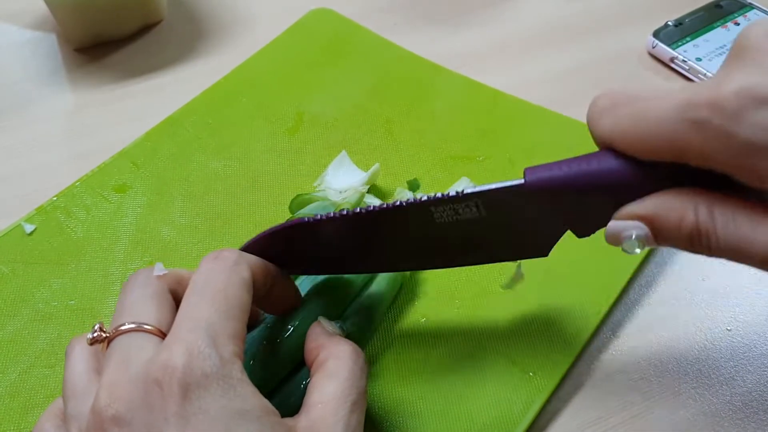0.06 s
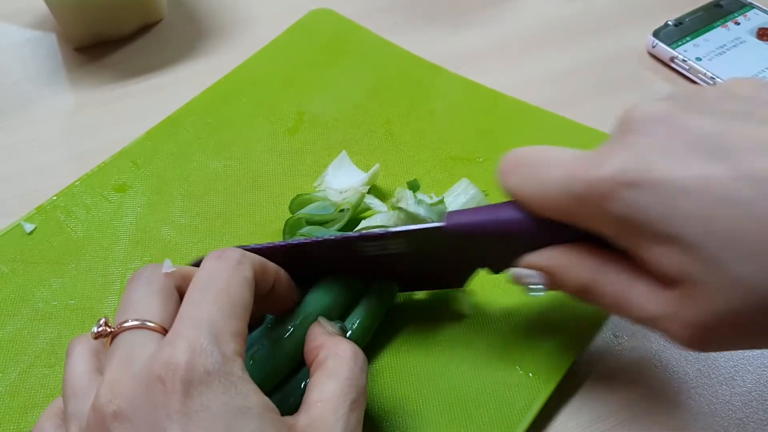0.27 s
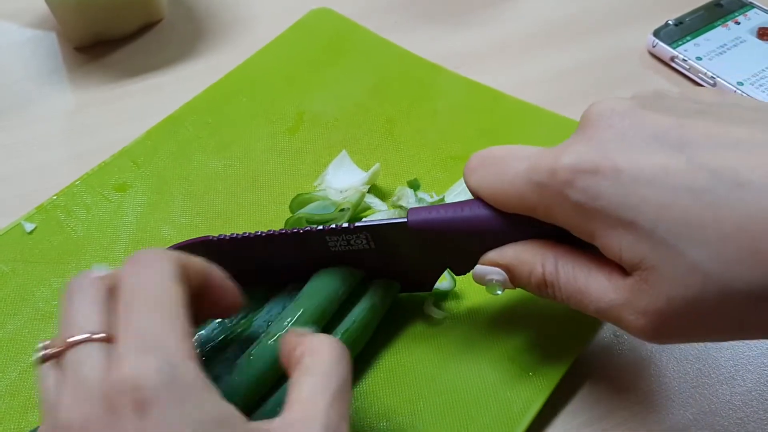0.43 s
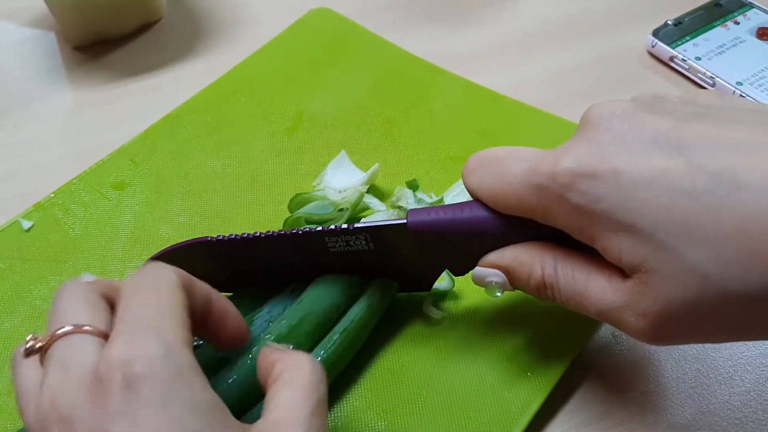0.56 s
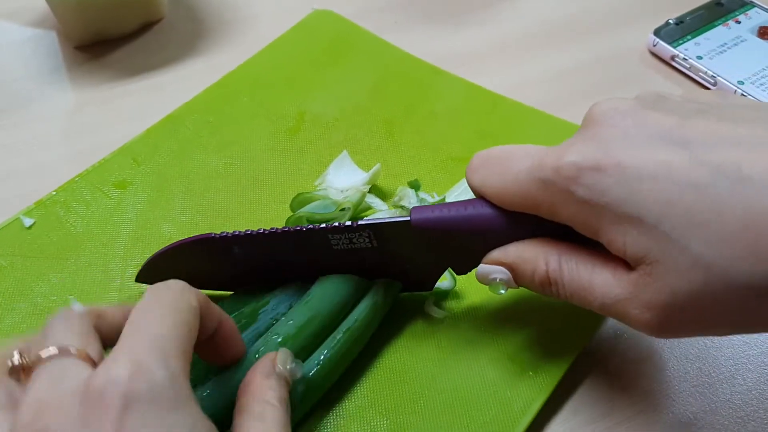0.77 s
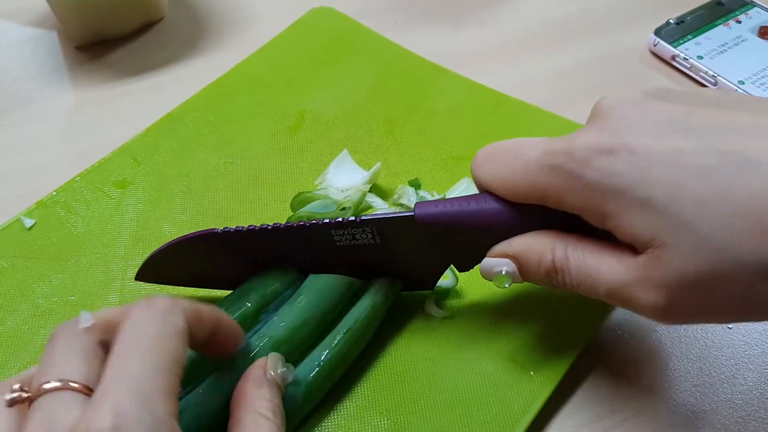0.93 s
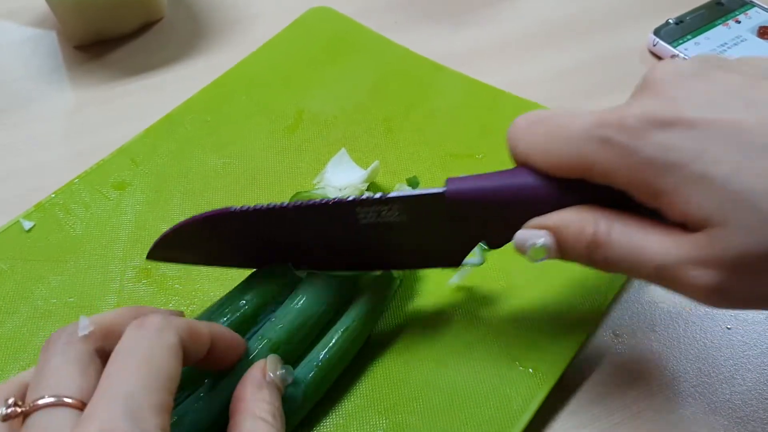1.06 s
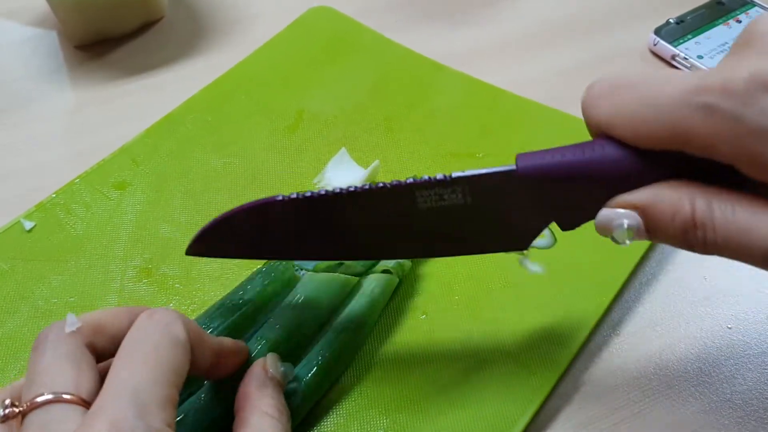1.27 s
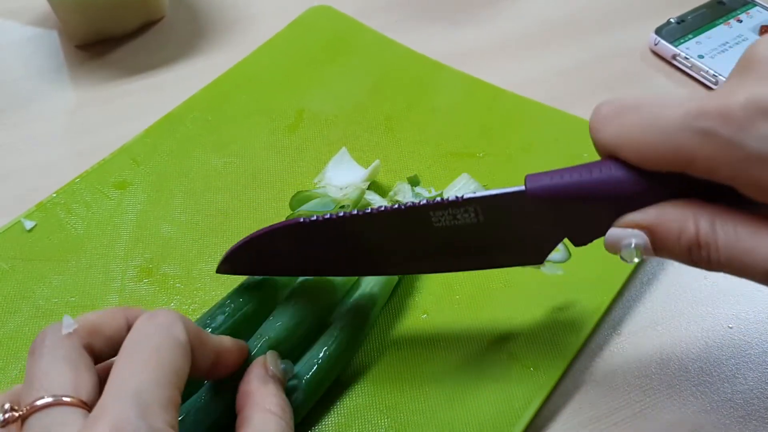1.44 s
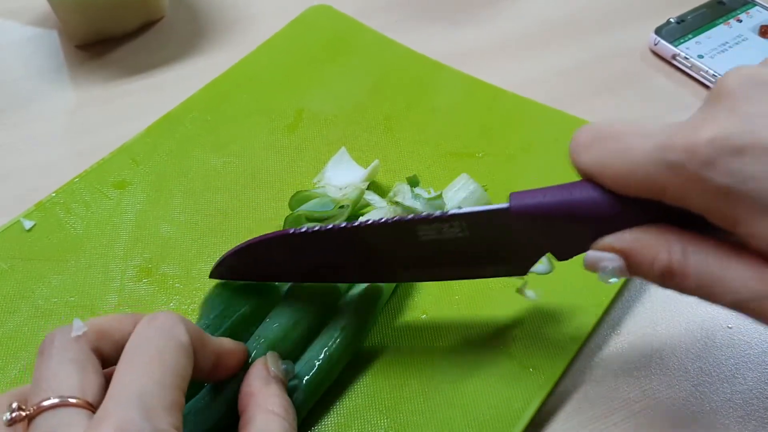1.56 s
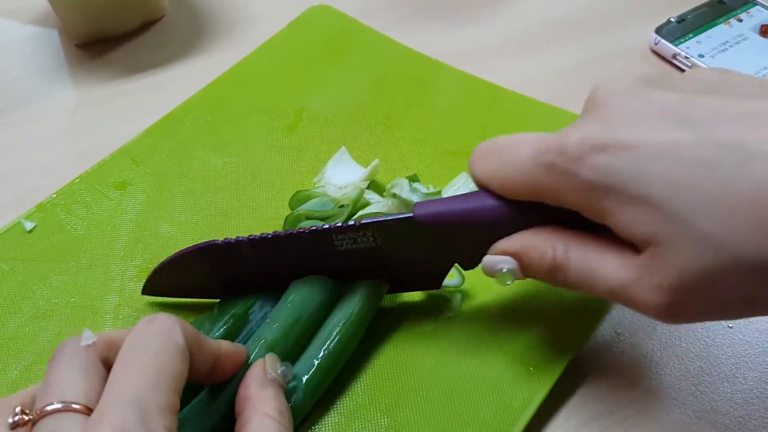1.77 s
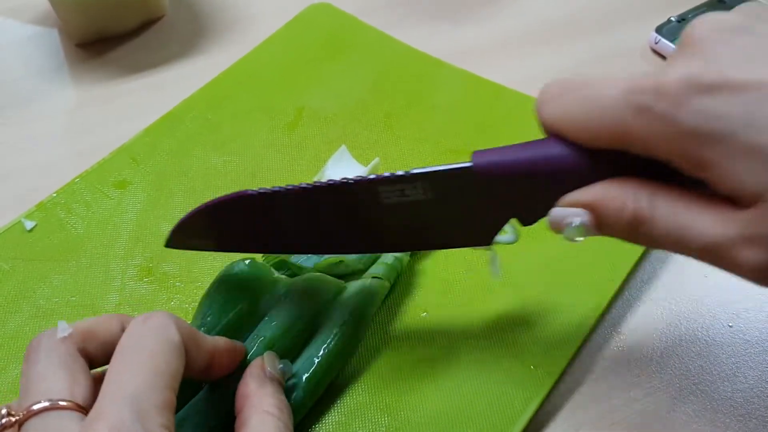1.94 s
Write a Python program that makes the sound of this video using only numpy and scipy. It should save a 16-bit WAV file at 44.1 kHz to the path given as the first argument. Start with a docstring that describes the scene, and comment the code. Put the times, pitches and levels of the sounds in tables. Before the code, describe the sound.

Two crisp, wet knife cuts through fibrous onion stalks, each ending in a knock on the board

```python
"""In a quiet kitchen, a knife cuts twice through a bunch of green onion stalks on a plastic board.
Crunch and rustle are dense random clicks, filtered into bands that follow level curves; single fibres
snap as a sharp tick and a resonant pop; the blade's blows are smooth pushes that ring the board's modes.
A close pair of microphone ports hears this, with a short reverberant tail and steady room tone behind."""
import sys
import numpy as np
from scipy import signal
from scipy.fft import rfft, irfft
from scipy.io import wavfile
from scipy.ndimage import uniform_filter1d

SR = 44100
rng = np.random.default_rng(int(sys.argv[2]) if len(sys.argv) > 2 else 0)


def master_out(mix):
    """Clip the mix to full scale and print it as 16-bit PCM to the path in sys.argv[1]."""
    frames = np.transpose(np.atleast_2d(mix))
    ceiling = np.clip(frames, -1, 1)
    pcm = np.round(ceiling * 32767).astype(np.int16)
    wavfile.write(sys.argv[1], SR, pcm)


N = 88200  # samples: two seconds


def amp(db):
    """Decibel definition: 20 dB is a tenfold amplitude ratio."""
    return 10 ** (np.asarray(db) / 20)


def evened(x):
    """Normalisation to unit root-mean-square amplitude."""
    return x / np.sqrt(np.mean(x ** 2) + 1e-20)


def read(points, hz):
    """Interpolation of a curve along a logarithmic frequency axis."""
    f, value = np.transpose(points)
    return np.interp(np.log(hz + 1), np.log(f + 1), value)


def add(mix, s, sound):
    """Superposition: a sound starting at s seconds sums into the mix, cut off at its end."""
    part = mix[round(s * SR):][:len(sound)]
    part += sound[:len(part)]


def colour(x, points):
    """Linear filtering: the spectrum is weighted by a curve that falls away outside its ends."""
    (low_hz, low_db), (high_hz, high_db) = points[0], points[-1]
    curve = [(low_hz / 1.5, low_db - 25)] + list(points) + [(high_hz * 1.5, high_db - 25)]
    gain = amp(read(curve, np.fft.rfftfreq(x.shape[-1], 1 / SR)))
    return irfft(rfft(x) * gain, x.shape[-1])


def ring(x, hz, t60):
    """Damped resonance: a unit click excites a decaying sine whose envelope starts near 1."""
    radius = 10 ** (-3 / (t60 * SR))
    w = 2 * np.pi * hz / SR
    return signal.lfilter([0, np.sin(w)], [1, -2 * radius * np.cos(w), radius * radius], x)


# Spectra of the three upper crackle layers. Each row: frequency in Hz, relative level in dB.
SIZZLE_SPECTRUM = [(4710, -24.5), (8000, -7.5), (12300, -3), (15300, -8), (16300, -18.5), (16500, -56.5)]
FIZZ_SPECTRUM = [(1760, 2), (3000, -0.5), (3920, 4), (6080, -3), (8000, -35.5), (10400, -40.5),
                 (17600, -120)]
BODY_SPECTRUM = [(380, -13.5), (650, 2), (720, -3.5), (1110, -6), (1190, -8), (3000, -12), (3900, -38),
                 (6600, -120)]
SHARED = 0.53  # amplitude share of the crackle that both ports hear alike; the fibres lie spread out


def crackle(passages, clicks_per_s, spread_db, low):
    """Shot noise: dense clicks of uneven size, heard as sizzle, fizz and body over a low part."""
    t = np.arange(N) / SR
    clicks = rng.standard_normal((4, N)) * (rng.random((4, N)) < clicks_per_s / SR)
    clicks = clicks * amp(spread_db * np.minimum(rng.exponential(1, (4, N)), 4))
    pair = SHARED * clicks[0] + np.sqrt(1 - SHARED ** 2) * clicks[1:3]
    upper = [colour(pair, curve) for curve in (SIZZLE_SPECTRUM, FIZZ_SPECTRUM, BODY_SPECTRUM)]
    layers = [evened(layer) for layer in upper + [low(clicks[3])]]
    out = np.zeros((2, N))
    for passage in passages:
        s, *levels = np.transpose(passage)
        for layer, db in zip(layers, levels):
            out += layer * amp(np.interp(t, s, db, -140, -140))  # silent outside the passage
    return out


# Crunch of tearing fibres, in passages of level curves.
# Each row: time in seconds, then sizzle, fizz, body and low levels in dB before the crackle trim.
CRUNCH_PASSAGES = [
    [(0.1, -87.5, -86, -77.5, -61), (0.148, -56, -57.5, -53, -67.5), (0.164, -50.5, -49.5, -48, -44),
     (0.176, -35, -40.5, -34.5, -35), (0.194, -31, -35.5, -40.5, -54), (0.214, -26, -30, -24.5, -23.5),
     (0.234, -33.5, -32, -36.5, -24.5), (0.35, -60, -60, -50, -47.5), (0.382, -46, -47.5, -55.5, -50.5),
     (0.39, -56, -53.5, -54.5, -50), (0.48, -78, -78.5, -65, -62)],
    [(1.49, -83, -79, -61, -76), (1.522, -58.5, -56, -49.5, -49), (1.53, -56, -44.5, -36.5, -59),
     (1.542, -49.5, -53, -41.5, -52), (1.586, -43.5, -47, -44, -50), (1.594, -48, -49, -53.5, -51),
     (1.606, -37, -33, -28, -29), (1.614, -34.5, -43, -38.5, -30.5), (1.628, -30.5, -29.5, -33, -41),
     (1.638, -37, -36, -38.5, -34.5)],
    [(1.65, -31, -27, -36.5, -27), (1.67, -31, -31.5, -35, -33.5), (1.698, -35, -34, -38, -34),
     (1.804, -60, -54.5, -56, -54.5), (1.824, -58.5, -54.5, -45.5, -54), (1.904, -75.5, -70.5, -63.5, -80),
     (1.98, -84, -73, -79, -59.5)],
]
PRESSED = 0.6  # factor on the board's ring times during the crunch


def crunch():
    """Forced vibration: tearing fibres crackle, and their clicks drive the damped board."""
    passages = [CRUNCH_PASSAGES[0], CRUNCH_PASSAGES[1] + CRUNCH_PASSAGES[2]]
    return crackle(passages, 14000, 2.7, low=lambda force: board(force, PRESSED))


# Single fibres snapping. Each row: tick start in seconds, tick peak in dB, tick centre in Hz,
# pop peak in dB, pop pitch in Hz.
FIBRE_SNAPS = [(0.127, -43, 7950, -57, 1310), (0.142, -41, 9700, -43, 1210), (0.169, -34, 11900, -40, 885),
               (.178, -26.5, 11900, -26, 1470), (0.205, -20, 9000, -24, 1400),
               (0.214, -21.5, 11100, -27.5, 1510), (0.22, -20, 14000, -21, 1830),
               (0.251, -17, 12100, -26.5, 1680), (0.363, -33, 9100, -44, 2040),
               (.378, -38, 8500, -37, 2160), (.55, -50, 5000, -43, 2040), (.555, -35, 9900, -64, 1410),
               (0.561, -47.5, 14000, -63.5, 1500), (0.578, -56, 9900, -41, 735),
               (0.581, -47, 10000, -46, 1200), (0.581, -32, 9200, -55, 1210),
               (.593, -36.5, 9700, -57.5, 1210), (0.598, -53, 5030, -35, 1180),
               (0.624, -46, 8900, -47, 1430), (.635, -57, 9000, -49.5, 1450),
               (0.67, -55, 9100, -46.5, 1100), (.779, -60, 9400, -56, 1570), (.788, -64, 9500, -36, 2290),
               (.79, -59, 4000, -50, 700), (0.863, -56.5, 9560, -48, 1100), (.901, -69, 9500, -43.5, 2400),
               (0.933, -50.5, 5050, -42, 1085), (.95, -58.5, 9500, -44.5, 1060),
               (1.078, -79.5, 4000, -44, 1000), (1.165, -52, 10100, -73, 994),
               (1.344, -45, 8900, -32.5, 1050), (1.376, -43.5, 10100, -64, 1190),
               (1.4253, -36.5, 10400, -34.5, 1040), (1.444, -47, 10000, -43, 1090),
               (1.469, -41, 10700, -40, 1210), (1.479, -45, 9200, -60, 1300), (1.518, -52, 5000, -30, 750),
               (1.53, -29, 8700, -28.5, 1430), (1.5311, -31, 5000, -38.5, 2630),
               (1.5322, -35, 3960, -28.5, 1000), (1.604, -29, 4800, -21.5, 874),
               (1.627, -25, 8800, -22, 1140), (1.6436, -6, 4800, -20, 2600), (1.6428, -8, 10800, -39, 1480),
               (1.6452, -9, 7200, -39, 2420), (1.646, -33, 10600, -26, 1470),
               (1.652, -17, 10200, -30, 1550), (1.667, -53.5, 5000, -33, 1700),
               (1.703, -17, 9600, -44, 1540), (1.828, -63, 4090, -35, 1210), (1.91, -44.5, 9600, -65, 1440)]
TICK_T60, POP_T60, POP_LAG_S = 0.011, 0.0087, 0.00073  # seconds
TICK_TAIL_DB, TICK_RING_S = -16, 0.0009  # rattle level against the click; resonance t60
# Modes of the pop. Each row: level ratio, pitch ratio, t60 ratio.
POP_MODES = [(1, 1, 1), (0.49, 2.1, 0.51), (-0.41, 0.65, 1), (0.19, 3.4, 0.3)]


def snaps():
    """Impulsive release: a parting fibre ticks and rattles, then the stalk resonates in a hollow pop."""
    t, out = np.arange(2048) / SR, np.zeros(N)
    noise = rng.standard_normal((len(FIBRE_SNAPS), 2, len(t)))
    for (s, tick_db, tick_hz, pop_db, pop_hz), (rattle_noise, push_noise) in zip(FIBRE_SNAPS, noise):
        rattle = amp(TICK_TAIL_DB - 60 * t / TICK_T60) * rattle_noise * np.minimum(t / 0.0004, 1)
        click = t == 0
        tick = np.diff(ring(rattle - click, tick_hz, TICK_RING_S), prepend=0)
        # one roughened hump, a little shorter than a quarter of the pop's period
        push = (1 + 0.5 * push_noise) * np.sin(np.pi * np.minimum(4.5 * pop_hz * t, 1)) ** 2
        pop = sum(level * ring(push, ratio * pop_hz, decay * POP_T60) for level, ratio, decay in POP_MODES)
        add(out, s, amp(tick_db) * tick / abs(tick).max())
        add(out, s + POP_LAG_S, amp(pop_db) * pop / abs(pop).max())
    return out


# Blade meeting the board. Each row: start in seconds, relative strength in dB,
# approximate contact time in seconds.
BLADE_KNOCKS = [(0.177, -29, 0.00094), (0.2172, -13, 0.0023), (0.228, -13.5, 0.0021), (.26, -29, 0.002),
                (.283, -24, 0.0013), (.238, -17.5, 0.0011), (1.53, -50, 0.0012), (1.607, -27, 0.00046),
                (1.649, -29, 0.0014), (1.665, -15, 0.0031), (1.686, -25.5, .0015)]


def knocks():
    """Contact mechanics: each blow is a smooth push, and a longer contact excites less treble."""
    force = np.zeros(N)
    for s, db, contact in BLADE_KNOCKS:
        push = np.hanning(round(contact * SR) + 3)
        add(force, s, amp(db) * push / push.sum())
    return 0.5 * board(force)


# Modes of the board on the table. Each row: frequency in Hz, relative level in dB,
# undamped-by-hand t60 in seconds.
BOARD_MODES = [(79, -19, 0.36), (110.2, -0.5, 0.04), (215.4, -3.5, 0.069), (243, -15, 0.055),
               (308.8, -9, 0.12), (386.8, -1, 0.2), (418.6, -3.5, 0.24), (459.7, -18, 0.32),
               (527, -15, 0.33), (564.6, -22, .15), (668, -16.5, 0.15)]


def board(force, damping=1):
    """Modal superposition: the board's response is the sum of its decaying resonances."""
    return sum(amp(db) * ring(force, hz, damping * t60) for hz, db, t60 in BOARD_MODES)


# Rustle of the stalks, in passages of level curves.
# Each row: time in seconds, then sizzle, fizz, body and low levels in dB before the crackle trim.
RUSTLE_PASSAGES = [
    [(0.0, -80, -73, -68, -77), (0.01, -82, -75, -68, -65), (0.05, -102, -89, -75, -68),
     (0.062, -100, -91, -65, -63), (0.074, -85, -79, -69, -54), (0.088, -74, -85, -70, -67),
     (0.11, -82, -87, -79, -70), (0.12, -70, -73, -79, -54)],
    [(0.5, -69, -73, -61, -62), (0.53, -76, -73, -60.5, -63), (0.556, -70, -57.5, -49.5, -48),
     (0.568, -69, -62, -63, -63), (0.582, -50, -55, -55.5, -52), (0.604, -64.5, -57.5, -51, -46.5),
     (0.696, -90.5, -79, -64.5, -60.5), (0.74, -95, -97.5, -74, -59)],
    [(0.76, -102, -99, -93, -74), (0.786, -69, -64, -47.5, -49), (0.854, -84, -78, -70, -67),
     (0.87, -63.5, -61, -55.5, -62), (0.914, -84, -73, -60.5, -69), (0.938, -73, -69.5, -58, -70),
     (1.048, -102, -92.5, -77.5, -72), (1.08, -95.5, -95, -72, -72)],
    [(1.345, -85, -71.5, -60, -66.5), (1.42, -92, -84, -65.5, -71), (1.45, -81, -73, -52, -70),
     (1.5, -89, -69, -63, -56)],
]
# Spectrum of stalks scuffing the board. Each row: frequency in Hz, relative level in dB.
SCUFF_SPECTRUM = [(88, -45), (150, -10.5), (286, -1), (345, -7.5), (564, 0.5), (800, -4.5), (1040, -48.5),
                  (1760, -120)]


def rustle():
    """Friction noise: the stalks' sparser clicks crackle over a filtered low scuffing."""
    return crackle(RUSTLE_PASSAGES, 7000, 2.8, low=lambda force: colour(force, SCUFF_SPECTRUM))


# Phase between the ports. Each row: frequency in Hz, further lead of the left port in radians.
PORT_LEAD = [(60, 0.44), (450, 0), (860, 1.86), (1300, -0.67), (2200, -0.16)]
# Level between the ports. Each row: frequency in Hz, left minus right in dB.
PORT_TILT = [(60, -1), (150, 1.5), (400, -2.5), (1200, 6.5), (2400, 1), (5000, 2), (9000, 9.5), (15000, 4)]
PORT_LAG_S = 0.00014  # seconds by which the right port hears later


def ports(x):
    """Interchannel difference: the right port hears direct sound later, with its own phase and level."""
    hz = np.fft.rfftfreq(N, 1 / SR)
    half_tilt = amp(0.5 * read(PORT_TILT, hz))
    lag = read(PORT_LEAD, hz) + 2 * np.pi * hz * PORT_LAG_S
    return irfft(rfft(x) * np.array([half_tilt, np.exp(-1j * lag) / half_tilt]), N)


# Decay of the room. Each row: frequency in Hz, t60 in seconds.
ROOM_T60 = [(60, 0.27), (300, 0.23), (1100, 0.56), (3000, 0.42), (8000, 0.44), (16000, 0.11)]
# Strength of the room. Each row: frequency in Hz, relative level in dB.
ROOM_LEVEL = [(60, -19), (350, -17), (700, -3), (3000, 1.5), (16000, 4)]


def room(x):
    """Reverberation: sparse taps of random sign, each band decaying exponentially at its own rate."""
    taps = np.zeros((2, SR // 2))
    at = np.arange(100, SR // 2 - 20, 20)
    at = at + rng.integers(0, 20, (2, len(at)))  # one tap somewhere in every 20 samples
    np.put_along_axis(taps, at, rng.choice([-1., 1.], at.shape), 1)
    hz, t, bands = signal.stft(taps, SR, nperseg=256)
    t60 = read(ROOM_T60, hz)[:, None]
    decay = amp(read(ROOM_LEVEL, hz)[:, None] - 60 * t / t60)
    tail = signal.istft(bands * decay / np.sqrt(100 * t60), SR, nperseg=256)[1]
    return signal.fftconvolve(x[None], 0.28 * tail, axes=1)[:, :N]


# Spectrum of the room tone. Each row: frequency in Hz, relative level in dB.
HUM_SPECTRUM = [(12, -32.5), (20, -10.5), (49, -5.5), (131, -8.5), (174, -16.5), (251, -2.5), (351, -12),
                (428, -12.5), (465, -11), (634, -15), (1180, -24), (7950, -56.5), (9410, -39.5),
                (13900, -55), (16500, -48.5)]
# Coherence of the room tone. Each row: frequency in Hz, left-right likeness from 0 to 1.
HUM_LIKENESS = [(60, 1), (180, 0.81), (550, 0.24), (1650, 0.02), (4970, 0.05), (15000, 0.09)]
HUM_DB = -59  # root-mean-square level


def hum():
    """Partially coherent noise: steady room tone with slowly drifting patches of level."""
    frames, hz = N // 256 + 5, np.fft.rfftfreq(1024, 1 / SR)
    a, b, c, d, patches = rng.standard_normal((frames, 513, 5)).T
    patches = uniform_filter1d(patches, 10, 0)  # smooth over frequency
    patches = evened(uniform_filter1d(patches, 12, 1))  # smooth over time
    same = read(HUM_LIKENESS, hz)[:, None]
    left, other = a + 1j * b, c + 1j * d
    bands = np.array([left, same * left + np.sqrt(1 - same ** 2) * other])
    bands *= amp(read(HUM_SPECTRUM, hz)[:, None] + 0.5 * patches)
    tone = signal.istft(bands, nperseg=1024, noverlap=768)[1][:, :N]
    return amp(HUM_DB) * evened(tone)


MIC_LOW_HZ = 68  # high-pass corner of the close sound


def scene():
    """Superposition of direct sound, its reverberation and the room tone."""
    near = amp(-1.5) * (crunch() + rustle()) + snaps() + knocks()  # crackle trim of -1.5 dB
    high_pass = signal.butter(4, MIC_LOW_HZ, "high", fs=SR, output="sos")
    thin = signal.sosfilt(high_pass, near)
    return ports(thin) + room(thin.mean(0)) + hum()


EDGE_HZ = 15900  # upper band limit


def record(dry):
    """Band limitation: a linear-phase low-pass removes the top of the spectrum."""
    low_pass = signal.firwin(511, EDGE_HZ, window=("kaiser", 9), fs=SR)
    return signal.oaconvolve(dry, low_pass[None], "same")


dry = scene()
out = record(dry)
master_out(out)
```